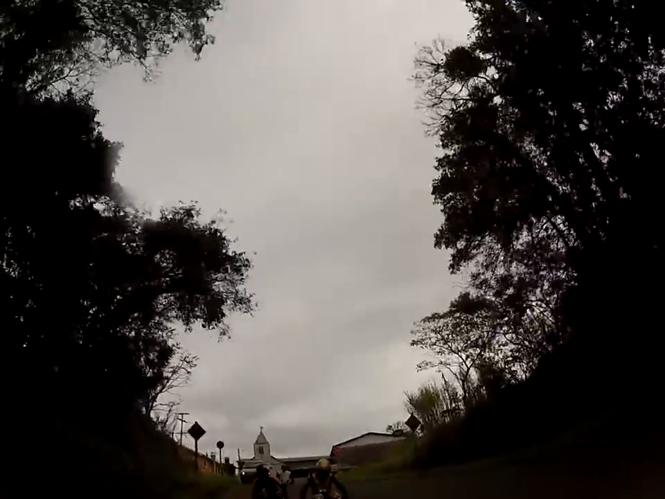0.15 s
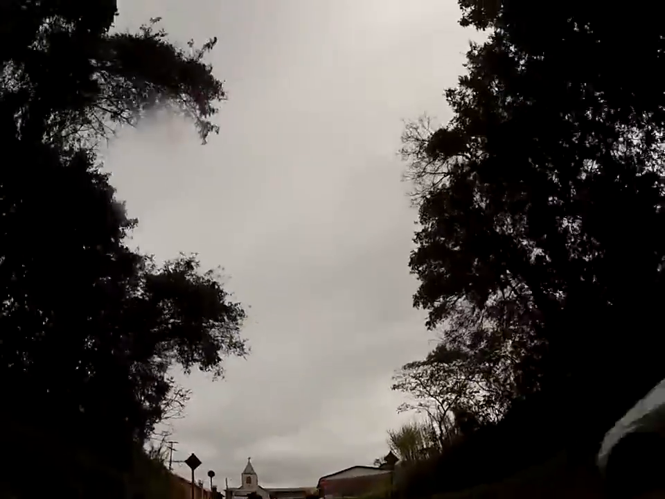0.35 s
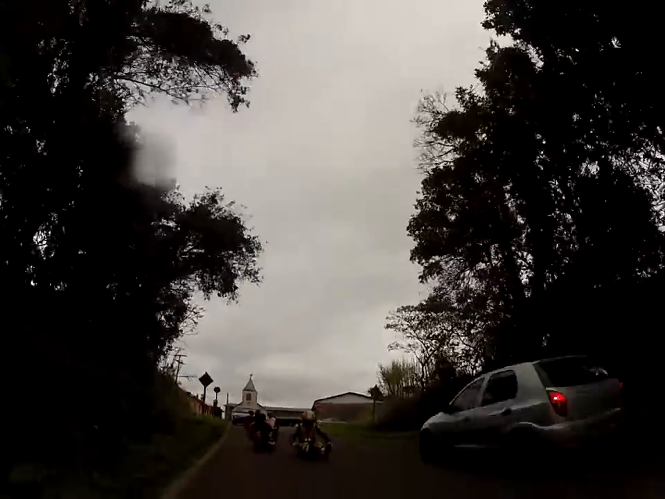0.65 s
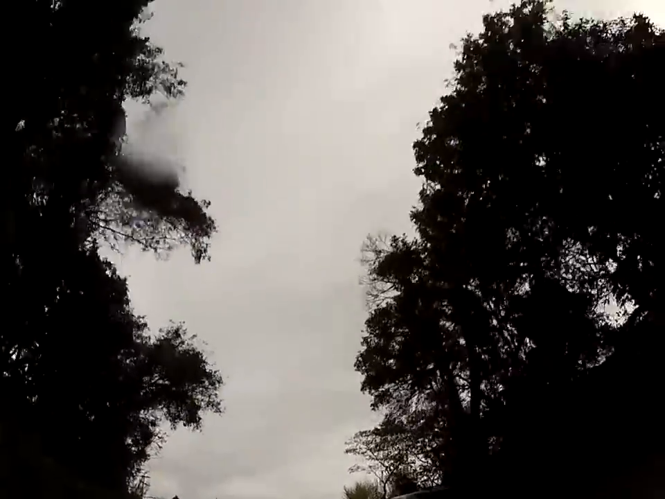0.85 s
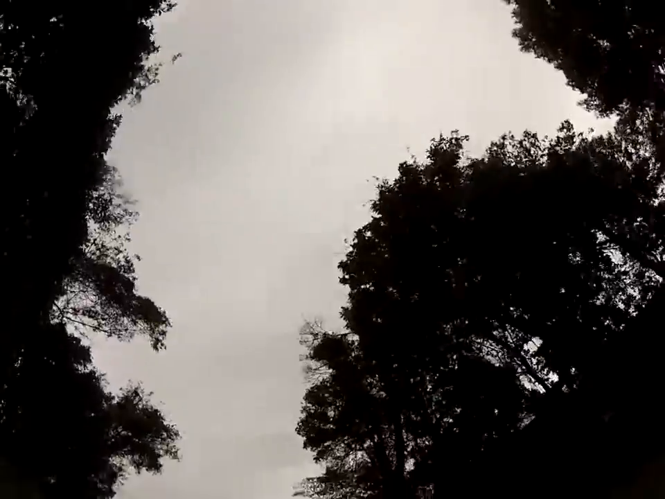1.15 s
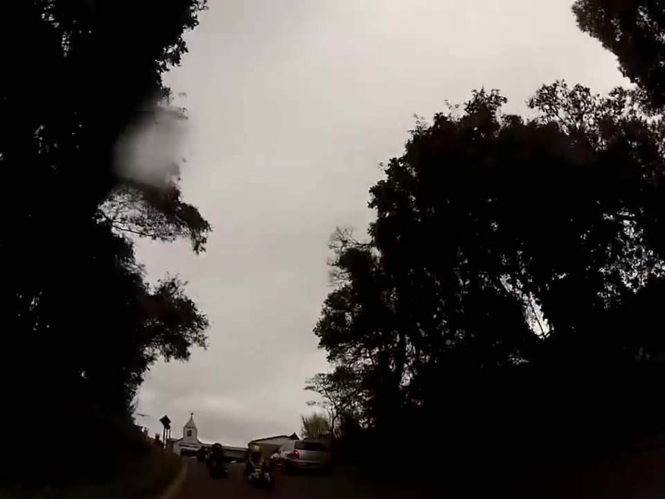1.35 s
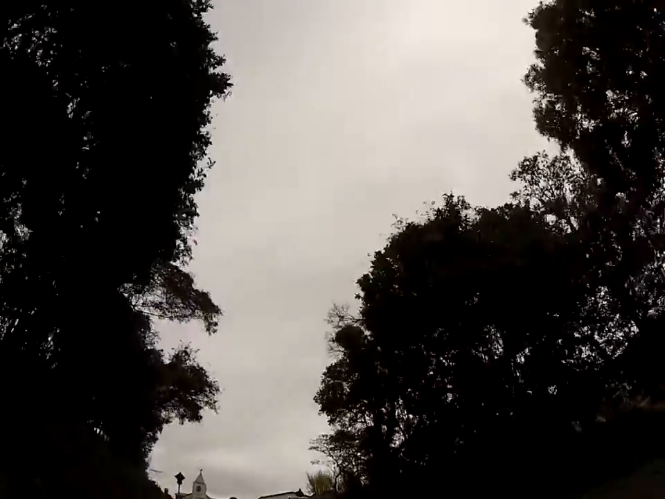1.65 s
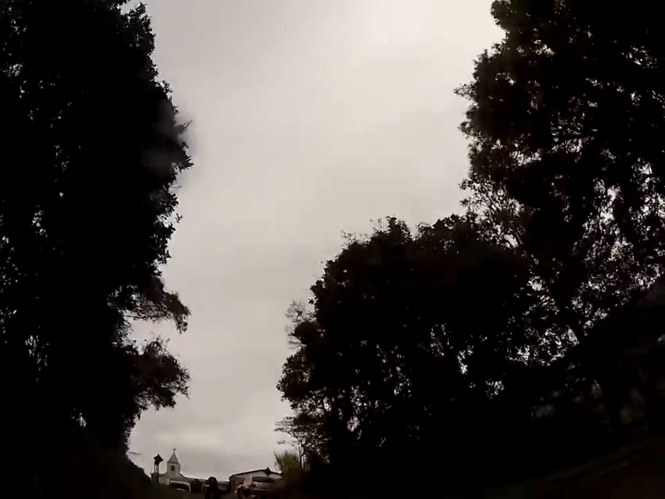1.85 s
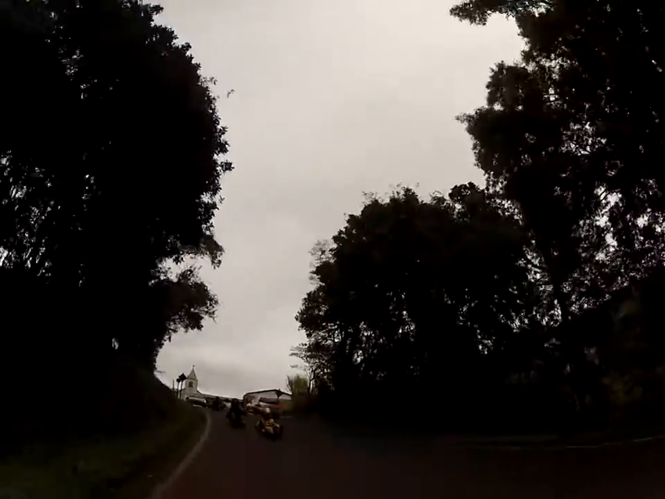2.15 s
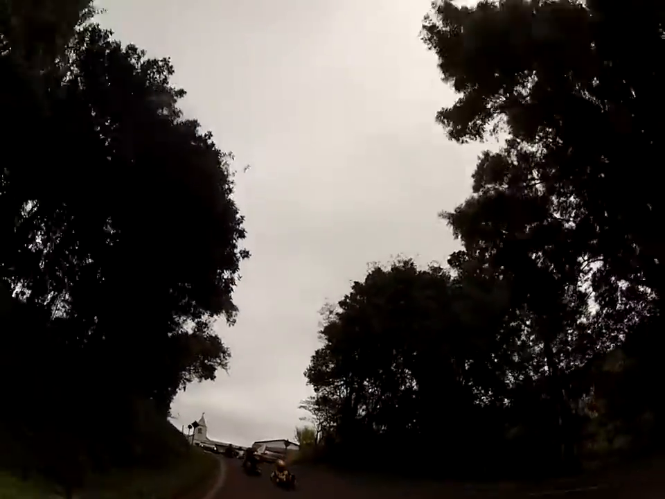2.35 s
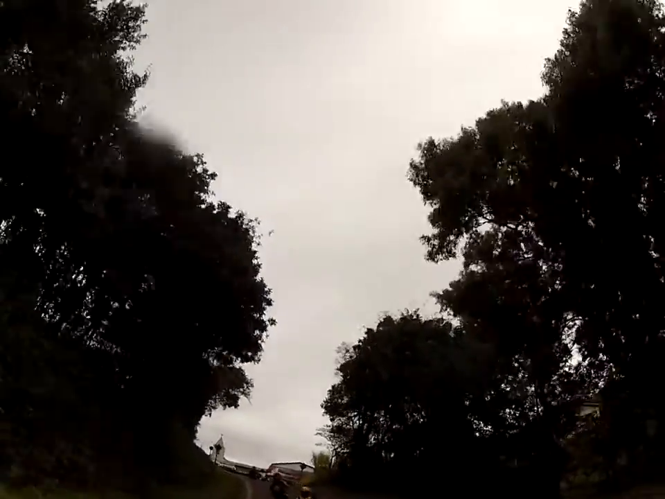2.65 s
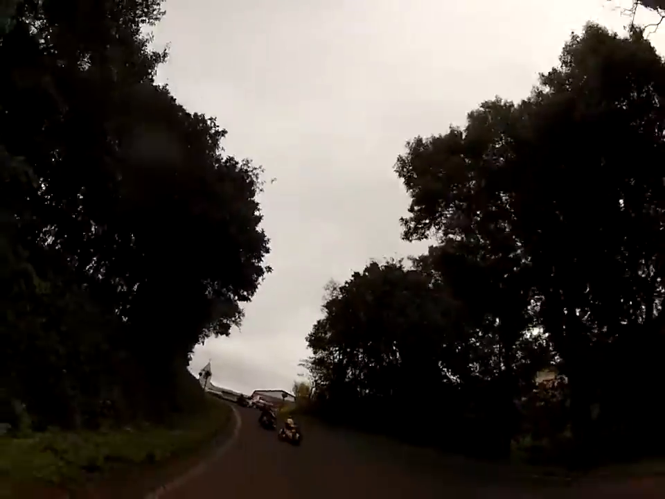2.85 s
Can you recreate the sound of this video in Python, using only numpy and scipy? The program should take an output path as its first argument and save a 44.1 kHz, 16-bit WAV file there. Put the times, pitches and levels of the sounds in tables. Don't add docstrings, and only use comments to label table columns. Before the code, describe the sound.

Close, rough wheel roar on an open road, heard through a small camera fixed to the deck; loose fittings tick, cracks thump, wind rumbles, and a late heavy slam briefly chokes the sound.

```python
import sys
import numpy as np
from scipy import signal
from scipy.io import wavfile

SR = 44100
rng = np.random.default_rng(int(sys.argv[2]) if len(sys.argv) > 2 else 0)


def boost_factor(decibels):
    exponent = np.asarray(decibels, float) / 20
    return 10 ** exponent


def pcm_store(signal):
    levels = np.round(np.clip(np.atleast_2d(signal), -1, 1) * 32767)
    wavfile.write(sys.argv[1], SR, levels.astype(np.int16).T)


N = 132300


def drift(hz):
    pole = np.exp(-2 * np.pi * hz / SR)
    slow = signal.lfilter([1], [1, -2 * pole, pole * pole], rng.standard_normal(N + SR))[SR:]
    return slow / slow.std()


def rms_one(x):
    return x / np.sqrt(np.mean(x ** 2))


def grains(per_s, spread_db):
    level_db = spread_db * np.minimum(rng.exponential(1, N), 4)
    size = boost_factor(level_db) * rng.choice([-1, 1], N)
    return size * (rng.random(N) < per_s / SR) + 1e-18


def body(x, peaks):
    out = 0
    for k, (hz, width_hz, db) in enumerate(peaks):
        r = np.exp(-np.pi * width_hz / SR)
        zeros = [(1 - r * r) / 2, 0, (r * r - 1) / 2]
        poles = [1, -2 * r * np.cos(2 * np.pi * hz / SR), r * r]
        out = out + (-1) ** k * boost_factor(db) * signal.lfilter(zeros, poles, x)
    return out


# (time [s], axle roar [dB], grit [dB], deck boom [dB])
ROAD_LOAD = [(0, -21, -33, -15), (.2, -18.5, -30.5, -14.5), (.4, -18.5, -34, -11.5),
             (.53, -16.5, -33, -14.5), (.75, -16.5, -32, -13), (.95, -16, -34.5, -14.5),
             (1.05, -17, -31.5, -11), (1.2, -15, -29.5, -12.5), (1.4, -15, -30.5, -13.5),
             (1.6, -17, -28.5, -13.5), (1.8, -16.5, -31, -11), (2.0, -17, -33, -14),
             (2.2, -16, -32.5, -12.5), (2.32, -15.5, -31.5, -13), (2.5, -17.5, -30.5, -15.5),
             (2.65, -17.5, -31.5, -16.5), (2.77, -16, -30, -15), (3, -15.5, -31.5, -16.5)]


def road(column):
    rows = np.array(ROAD_LOAD)
    return boost_factor(np.interp(np.arange(N) / SR, rows[:, 0], rows[:, column]))


# (frequency [Hz], width [Hz], level [dB])
DECK_RESONANCES = [(132.5, 22.6, -14.5), (216.2, 24, -2), (269.6, 21.7, 2), (337, 62.7, -5)]
# (frequency [Hz], width [Hz], level [dB])
AXLE_RESONANCES = [(462, 37.4, 0.5), (539, 74, -2), (652, 76, -2.5), (739, 58, -5.5)]


def roar():
    bumps = grains(per_s=2500, spread_db=2.0) * boost_factor(1.24 * drift(hz=8.8))
    steep = signal.butter(4, 850, fs=SR, output="sos")
    boom, axle = signal.sosfilt(steep, [body(bumps, DECK_RESONANCES), body(bumps, AXLE_RESONANCES)])
    return road(column=3) * rms_one(boom) + road(column=1) * rms_one(axle)


# (frequency [Hz], width [Hz], level [dB])
HOUSING_RESONANCES = [(930, 138, 3), (1140, 286, 0), (1474, 337, 1), (2190, 550, 1.5), (2527, 480, 3),
                      (3025, 504, 0), (3880, 1430, -9), (4860, 120, -2.5), (5440, 850, -10)]


def grit():
    fine = grains(per_s=2500, spread_db=2) * boost_factor(1.5 * drift(hz=23.1))
    return road(column=2) * rms_one(body(fine, HOUSING_RESONANCES))


def shudder():
    start_s, start_db, t60_s = 2.770, 5.5, 0.065
    since = np.arange(N) / SR - start_s
    fading = (since > 0) * boost_factor(start_db - 60 * np.maximum(since, 0) / t60_s)
    return fading * rms_one(body(grains(per_s=1500, spread_db=4.5), HOUSING_RESONANCES))


def struck(s, db, modes, count=3):
    rise_s, contact_s, contact_loss_db, mode_scatter_db = .0012, .0012, 1.47, 2
    draw = rng.standard_normal((len(s), len(modes) + count))
    own = draw[:, -count:]
    contact = np.arange(count)
    at_s = s[:, None] + rise_s + contact_s * contact * (1 + .2 * own)
    at = (at_s * SR).astype(int).clip(0, N - 1)
    size = np.sign(own) * boost_factor(-contact_loss_db * contact)
    out = np.zeros(N)
    for k, (hz, level_db, t60_s) in enumerate(modes):
        clicks = np.full(N, 1e-18)
        strength = boost_factor(db + level_db + mode_scatter_db * draw[:, k])
        np.add.at(clicks, at, strength[:, None] * size)
        r, w = boost_factor(-60 / (t60_s * SR)), 2 * np.pi * hz / SR
        out += signal.lfilter([0, np.sin(w)], [1, -2 * r * np.cos(w), r * r], clicks)
    return out


# (time [s], depth [dB], recovery [dB/s])
GAIN_DUCKS = [
    (0.536, 10.5, 45),
    (1.16, 2.5, 40),
    (2.335, 10, 90),
    (2.77, 27.5, 117.5),
]


def duck_db():
    t, loss = np.arange(N) / SR, np.zeros(N)
    for s, depth_db, recovery in GAIN_DUCKS:
        loss = np.maximum(loss, (t >= s) * (depth_db - recovery * (t - s)))
    pole = np.exp(-2 * np.pi * 60.7 / SR)
    return signal.lfilter([1 - pole], [1, -pole], loss)


# (time [s], peak level [dB])
TRUCK_KNOCKS = [(0.062, -10.5), (0.219, -8), (0.291, -3), (0.299, -2), (0.444, -13), (0.497, -17),
                (0.511, -6), (0.527, 1.5), (0.532, 2.5), (0.561, -8.5), (0.578, -17), (0.638, -15),
                (0.681, -16), (0.915, -6), (1.153, -15), (1.269, -8), (1.286, -6.5), (1.421, -11),
                (1.6, -12), (2.025, -4), (2.034, -2), (2.212, -5.5), (2.327, -11.5), (2.478, -11),
                (2.492, -4), (2.549, -8), (2.593, -3), (2.633, -5), (2.745, -21), (2.812, -15)]
# (time [s], peak level [dB])
FITTING_TICKS = [(0.0623, -29), (0.2892, -28), (0.2882, -13.5), (0.4323, -11.5), (0.4419, -6.5),
                 (0.4496, -20), (0.5282, -11.5), (0.534, -9), (0.562, -26), (0.5774, -27), (0.5846, -19.5),
                 (0.9148, -18), (1.1145, -12.5), (1.1431, -8.5), (1.1527, -23), (1.268, -15), (1.2874, -18),
                 (1.3336, -11), (1.3546, -12), (1.8273, -16), (1.8604, -11), (2.025, -24), (2.031, -18.5),
                 (2.2147, -20), (2.331, -18.5), (2.5499, -18.5), (2.595, -17.5), (2.6962, -8.5),
                 (2.744, -9), (2.8113, -35),
                 (.155, -25), (.187, -22), (.22, -21.5), (.515, -20), (.637, -24.5), (.681, -23),
                   (1.027, -20), (1.18, -22), (1.22, -24), (1.25, -22), (1.302, -17), (1.608, -22),
                   (1.672, -21), (1.89, -24), (2.222, -24), (2.438, -21), (2.492, -22), (2.662, -24)]
# (time [s], dull level [dB], bright level [dB])
SLAM_CONTACTS = [
    (2.765, -9, -5),
    (2.7667, 6, -3.5),
    (2.7686, 8, 0),
    (2.776, 20.5, -7),
    (2.819, 2, -8),
    (2.909, -7.5, -27),
]
# (frequency [Hz], level [dB], t60 [s])
TRUCK_MODES = [(510, -10.5, 0.02), (856, -10, 0.04), (952, -2, 0.034), (1090, -4, 0.03), (1130, -9, 0.01),
               (1540, -20, 0.011)]
# (frequency [Hz], level [dB], t60 [s])
FITTING_MODES = [(1510, -8.5, 0.01), (1894, -2.5, .012), (2213, 0.5, 0.0079), (2636, -3, 0.013),
                 (2960, 1.5, 0.011), (3370, 1, .012), (3940, -5, 0.0093), (4580, -4.5, 0.013),
                 (5190, -6.5, 0.012)]


def jolts():
    loss, slam, out = duck_db(), np.array(SLAM_CONTACTS), 0
    knocking = (TRUCK_KNOCKS, -11, TRUCK_MODES, 1)
    ticking = (FITTING_TICKS, -10.5, FITTING_MODES, 2)
    for rows, trim_db, modes, slam_column in [knocking, ticking]:
        s, db = np.array(rows).T
        db = db + loss[(s * SR).astype(int)]
        all_s = np.r_[s, slam[:, 0]]
        all_db = np.r_[db, slam[:, slam_column]] + trim_db
        out = out + struck(all_s, all_db, modes)
    return out


# (time [s], peak level [dB])
CRACK_THUMPS = [(.112, -7), (0.264, -9), (0.332, -7), (.466, -2.5), (.921, -2), (1.031, -4), (1.153, 2),
                (1.605, 1), (2.156, -8), (2.198, 3.5), (2.263, -0.5), (2.329, 7), (2.661, 2), (2.743, -11),
                (2.97, -1)]
# (frequency [Hz], level [dB], t60 [s])
CRACK_MODES = [(298, -2, 0.028), (486, 1.5, .015), (660, -3.5, 0.0079)]


def thumps():
    s, db = np.array(CRACK_THUMPS).T
    soft = signal.butter(2, 900, fs=SR, output="sos")
    return signal.sosfilt(soft, struck(s, db - 6.5, CRACK_MODES, count=1))


# (time [s], level change [dB])
WIND_GUSTS = [
    (0, 2),
    (.2, 3.5),
    (.5, -1),
    (.9, -2.5),
    (1.4, -4),
    (1.7, 1.5),
    (2.1, 1),
    (2.5, 3),
    (3, 1),
]


def wind():
    band = signal.butter(1, [30.2, 97], "band", fs=SR, output="sos")
    low = signal.sosfilt(band, rng.standard_normal(N + SR))[SR:]
    low = signal.sosfilt(signal.butter(2, 200, fs=SR, output="sos"), low)
    gust_db = np.interp(np.arange(N) / SR, *np.transpose(WIND_GUSTS))
    return boost_factor(-27.5 + gust_db - 1.5 * drift(hz=3.3)) * rms_one(low)


def scene():
    mono = roar() + grit() + wind() + jolts() + thumps() + shudder()
    return np.tile(mono, (2, 1))


def top_cut(x):
    return signal.sosfilt(signal.butter(12, 16310, fs=SR, output="sos"), x)


def record(dry):
    hold_hz, headroom, ceiling = 12000, 1.08, 1.0
    alias_filter = signal.cheby2(4, 30, 6435 + 650, fs=SR, output="sos")
    x = signal.sosfilt(alias_filter, dry * boost_factor(-duck_db()))
    slow = np.clip(signal.resample_poly(x, hold_hz, SR, axis=1), -headroom, headroom)
    stairs = np.repeat(slow, 4, axis=1)
    held = signal.resample_poly(stairs, SR, 4 * hold_hz, axis=1)[:, :N]
    top_filter = signal.cheby2(20, 60, 15350 + 250, fs=SR, output="sos")
    held = signal.sosfilt(top_filter, held)
    apart = boost_factor(-43 - duck_db()) * drift(hz=60)
    mix = np.clip(held + apart * [[1], [-1]], -ceiling, ceiling)
    return top_cut(mix)


dry = scene()
out = record(dry)
pcm_store(out)
```